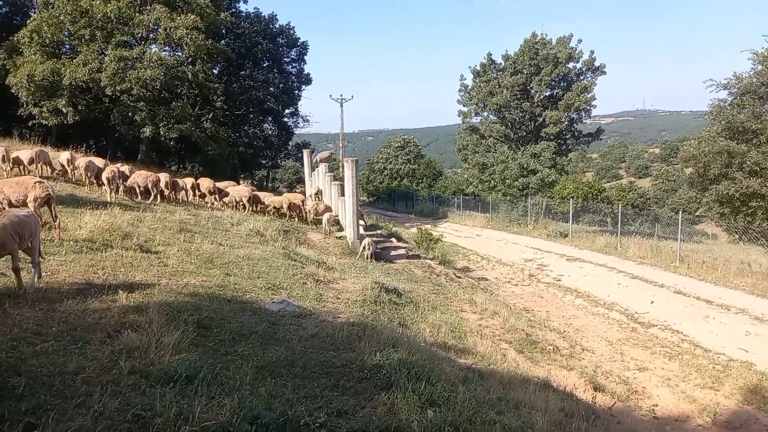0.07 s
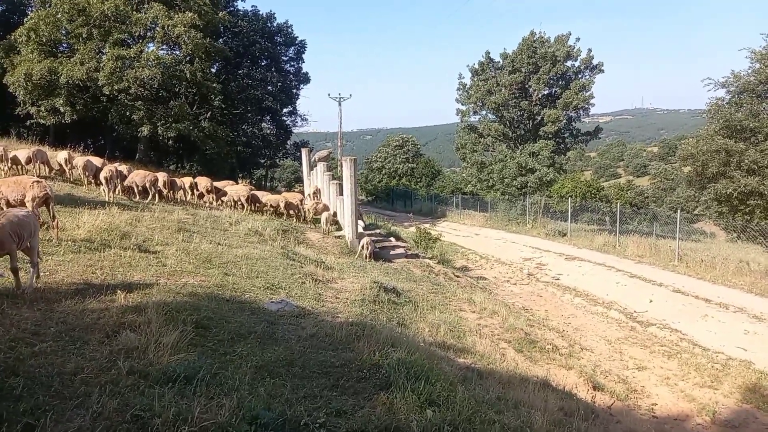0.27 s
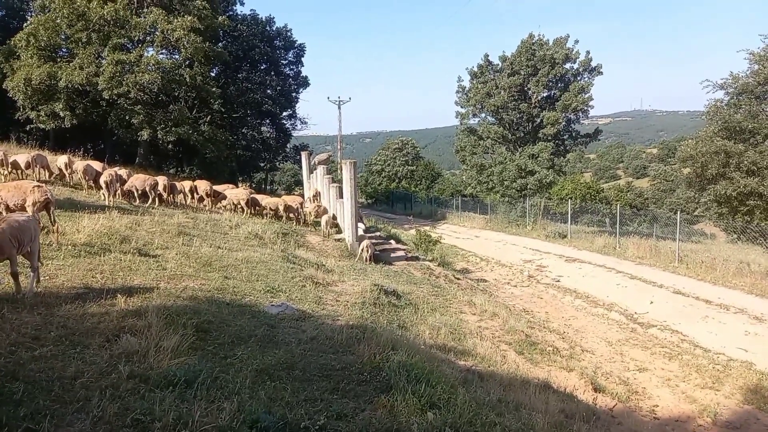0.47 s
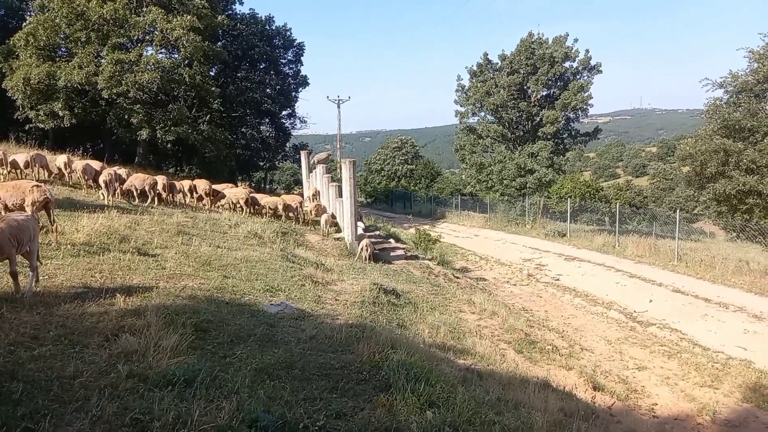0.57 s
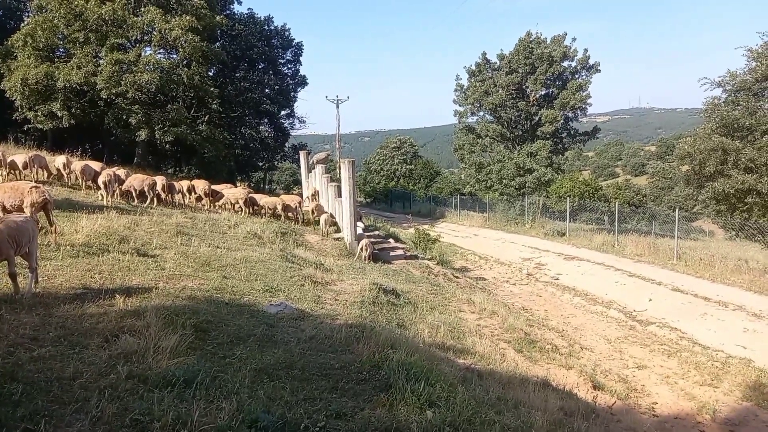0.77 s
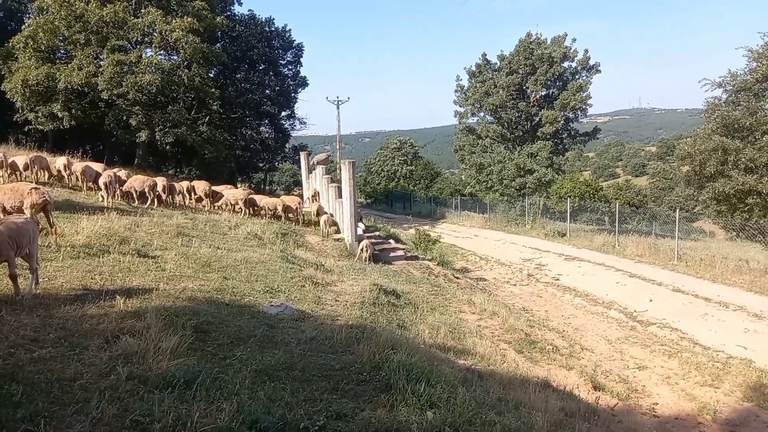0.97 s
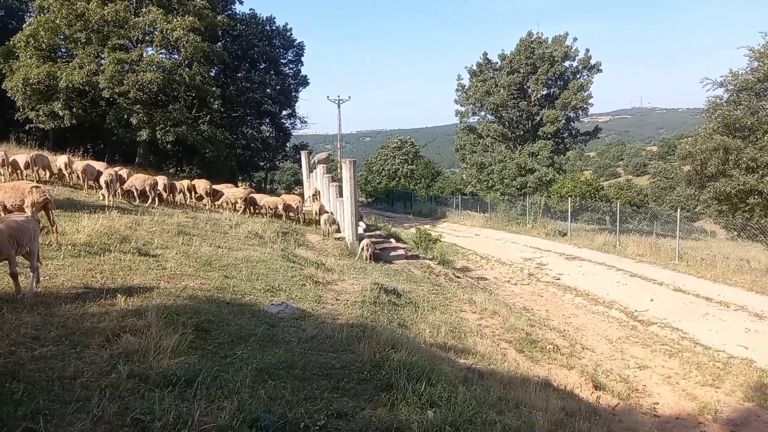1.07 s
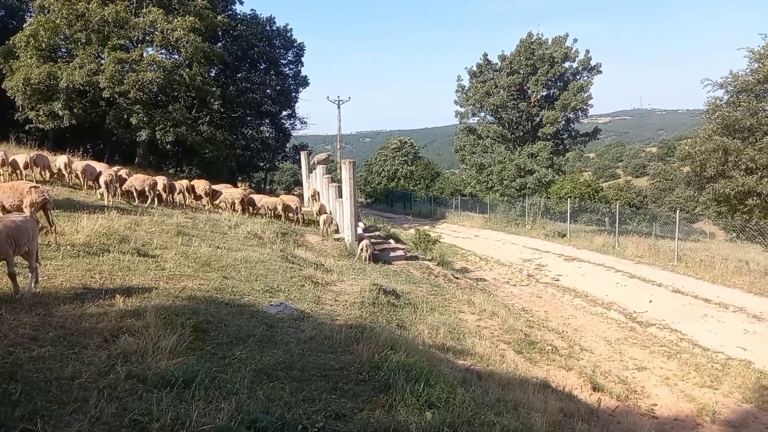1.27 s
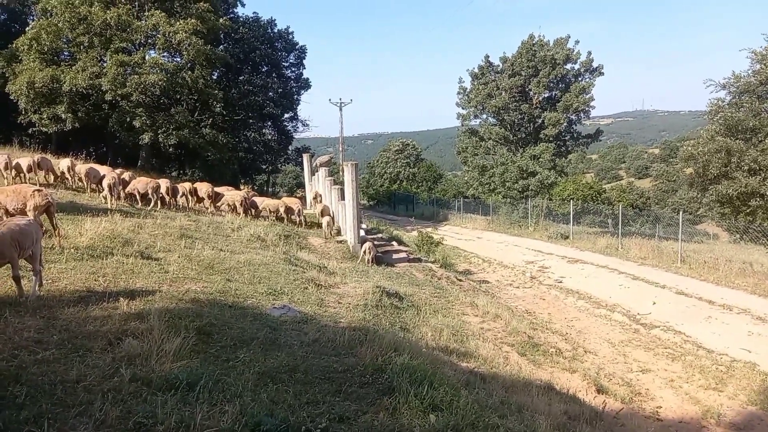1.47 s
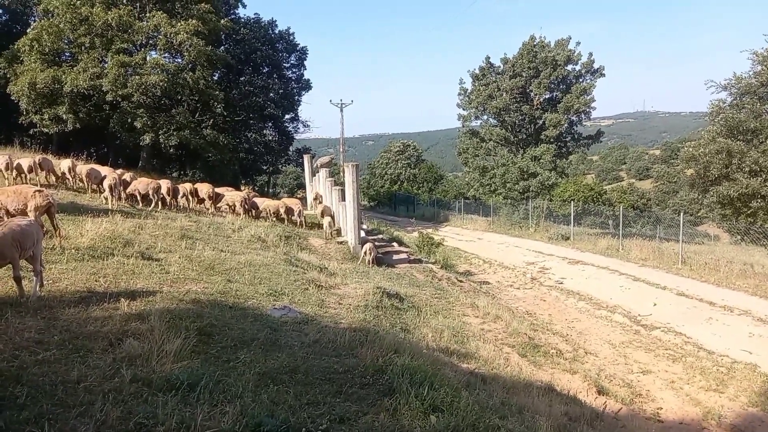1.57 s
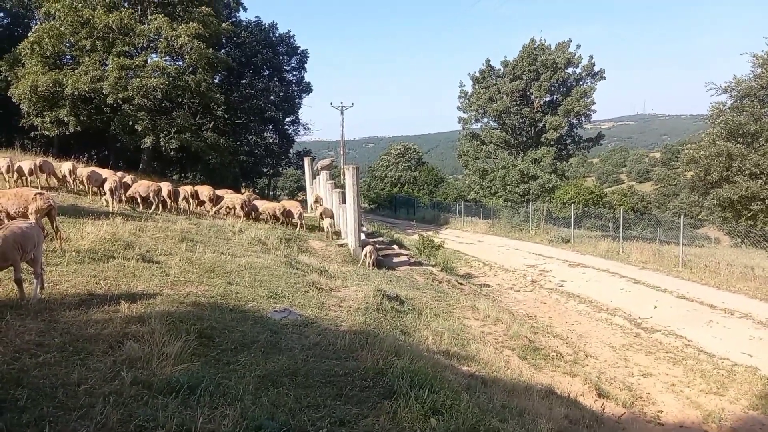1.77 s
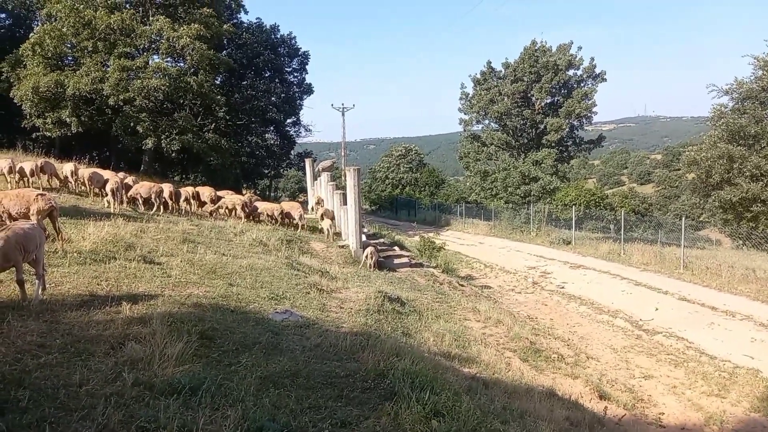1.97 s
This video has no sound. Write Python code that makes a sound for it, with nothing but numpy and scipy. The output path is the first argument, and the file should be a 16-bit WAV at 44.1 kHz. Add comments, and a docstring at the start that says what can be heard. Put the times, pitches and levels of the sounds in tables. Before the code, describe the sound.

A sheep gives one trembling bleat that rises and then sags in pitch on an open hillside. Tin flock bells clank and tinkle slightly to the left throughout, while wind rumbles on the microphone and then drops.

```python
"""A sheep bleats once on an open hillside: a clean, trembling voice that rises and sags,
made of vocal-fold harmonics filtered by the resonances of the throat.
To the left the flock's tin bells clank and tinkle, each clapper blow exciting damped modes.
Turbulent wind buffets the two microphone ports, then drops; leaves and grass hiss faintly."""
import sys
import numpy as np
from scipy import signal
from scipy.fft import rfft, irfft
from scipy.io import wavfile
from scipy.ndimage import uniform_filter1d

SR = 44100
rng = np.random.default_rng(int(sys.argv[2]) if len(sys.argv) > 2 else 0)


def output_pcm(signal):
    """Save a mono or channel-first signal as 16-bit PCM at the path in sys.argv[1].

    Samples are clipped to [-1, 1] before scaling.
    """
    pcm = np.clip(np.atleast_2d(signal).T, -1, 1) * 32767
    wavfile.write(sys.argv[1], SR, np.round(pcm).astype(np.int16))


N = 88817
T = np.arange(N) / SR


def undb(db):
    """Amplitude ratio of a level."""
    return 10 ** (np.asarray(db) / 20)


def unit(x):
    """Normalisation to rms 1."""
    return x / np.sqrt(np.mean(x ** 2))


def coloured_noise(spectrum):
    """Spectral shaping of white noise, rms 1."""
    hz, db = np.array(spectrum).T
    f = np.maximum(np.arange(N // 2 + 1) * SR / N, 1)
    gain = undb(np.interp(np.log(f), np.log(hz), db))
    return unit(irfft(rfft(rng.standard_normal(N)) * gain, N))


def band_noise(hz):
    """Band-pass filtering of white noise, rms 1."""
    bandpass = signal.butter(2, hz, "band", fs=SR, output="sos")
    return unit(signal.sosfilt(bandpass, rng.standard_normal(N)))


def wander(per_s):
    """Random modulation: smoothed steps, rms 1."""
    k = int(SR / per_s)
    steps = np.repeat(rng.standard_normal(N // k + 1), k)
    return unit(uniform_filter1d(uniform_filter1d(steps, k), k)[:N])


def place(x, lag_s, pan_db):
    """Localisation by time and level difference: the right channel is later and weaker."""
    delay = np.exp(-1j * np.pi * np.arange(N + 1) / N * lag_s * SR)
    late = irfft(rfft(x, 2 * N) * delay)[:N]
    return np.array([x * undb(pan_db / 2), late * undb(-pan_db / 2)])


def slope_echo(x, db, t60_s):
    """Diffuse reflection off the slope: a decaying tail, different left and right."""
    t = T[:SR // 3]
    tail = rng.standard_normal((2, len(t))) * undb(-60 * t / t60_s)
    tail *= undb(db) / np.sqrt((tail ** 2).sum(axis=1, keepdims=True))
    return signal.fftconvolve(x[None], tail, axes=1)[:, :N]


# Spectrum of the hillside hiss: f/Hz, relative level/dB
AIR_SPECTRUM = [(60, -2), (400, -0.5), (1000, 3), (1900, -8.5), (5600, 2), (7800, -5.5), (10800, -15.5),
                (15000, -10)]


def air(level_db=-62, pan_db=2, correlation=0.44):
    """Partial coherence: the hiss of distant leaves and grass is only partly common to both sides."""
    common = coloured_noise(AIR_SPECTRUM)
    separate = np.array([coloured_noise(AIR_SPECTRUM) for _ in range(2)])
    hiss = np.sqrt(correlation) * common + np.sqrt(1 - correlation) * separate
    return hiss * undb(level_db + 0.28 * wander(per_s=5.714) + np.array([[pan_db], [-pan_db]]) / 2)


# Gust envelope: t/s, relative level/dB
GUSTS = [(0.0, -52), (0.19, -39), (0.368, -47.5), (0.396, -38), (0.836, -54.5), (0.988, -42.5),
         (1.06, -66.5), (1.18, -41.5), (1.6, -81.5)]
# Spectrum of the rumble: f/Hz, relative level/dB
WIND_SPECTRUM = [(20, -22), (45, -13), (82, 1), (115, -9), (200, -17), (400, -29.5), (700, -61)]


def wind(buffet_db=3.5, pan_db=1):
    """Turbulent pressure fluctuation: each port rumbles in buffets of its own."""
    times, db = np.array(GUSTS).T
    ports = np.array([unit(coloured_noise(WIND_SPECTRUM) * undb(buffet_db * wander(per_s=30)))
                      for _ in range(2)])
    ports[1] -= 0.2 * ports[0]  # a small part in antiphase
    left_share = 1 / (1 + undb(-2 * pan_db))
    return 2 * ports * np.sqrt([[left_share], [1 - left_share]]) * undb(np.interp(T, times, db))


# Modes of each bell, the body clank first: f/Hz, relative level/dB, T60/s
BELL_MODES = { "big": [(912.8, 6.5, 0.22), (890.6, -6.5, 0.31), (2662, -23, 1), (4473, -19.5, 0.86),
              (4895, -25, 0.73)], "low": [(800.2, 5, 0.13), (4153, -17, 0.62), (9600, -20.5, 0.16)],
              "thin": [(957, 10.5, 0.2), (2813, 0, 0.61), (4800, -10, 0.28), (8970, -5.5, 0.065),
              (9580, 0.5, 0.037)], "round": [(986, 8, 0.13), (5297, -2, 0.25)], "tiny": [(4830, 0.5, 0.21)],
              "keen": [(4970, -1.5, .5), (9590, -1.5, 0.16)], "flat": [(1000, 11, 0.15), (2428, -7, 0.9),
              (4970, -1, 0.66)], }
# Short high modes of each bell: relative level/dB, list of f/Hz
SHINE_MODES = {"big": (-33, [7110, 10300, 11100, 14266]), "low": (-23, [5790, 12000]),
               "keen": (-10.5, [11500, 13400, 10000]), "thin": (-7, [5151, 12000, 15000]),
               "round": (-17.5, [7220, 11000, 12600, 13980]),
               "tiny": (-10.5, [6110, 9000, 10250, 12440, 13700]), "flat": (-11.5, [6900, 6600])}


def strike(out, bell, start_s, db, bright_db, stop_s, tune=1):
    """Impact excitation: adds to out a clack, a short rattle and modes that ring until stop_s."""
    rattle_db, rattle_s, clack_db, clack_s = -4, 0.0093, -24.5, 0.0021
    mode_scatter_db, shine_scatter_db, shine_t60_s, rise_cycles = 2.5, 4, 0.15, 2.8
    i = int(start_s * SR)
    t = T[:max(min(int((stop_s - start_s) * SR), N - i), 1)]
    chance = rng.standard_normal(12)
    shine_db, shine_hz = SHINE_MODES[bell]
    noise = np.resize(np.diff(rng.standard_normal(SR // 4)), len(t))
    rattle = undb(rattle_db + shine_db + bright_db) * np.exp(-t / rattle_s)
    clack = undb(clack_db) * np.exp(-t / clack_s)
    sound = noise * (rattle + clack)
    modes = [(*mode, mode_scatter_db) for mode in BELL_MODES[bell]]
    modes += [(hz, shine_db, shine_t60_s, shine_scatter_db) for hz in shine_hz]
    body_hz = modes[0][0]
    for k, (hz, mode_db, t60, scatter_db) in enumerate(modes):
        extra_db = bright_db + scatter_db * chance[k] if hz > body_hz else 0
        rise = 1 - np.exp(-t * hz / rise_cycles)
        sound += undb(mode_db + extra_db - 60 * t / t60) * rise * np.sin(2 * np.pi * hz * tune * t)
    release = np.clip((stop_s - start_s - t) * 500, 0, 1)
    out[i:i + len(t)] += undb(db) * sound * release


# Clapper blows: t/s, relative level/dB, upper-mode gain/dB, bell
CLAPPER_BLOWS = [(.002, -52, 2, "round"), (.075, -39.5, 1.5, "big"), (.109, -48, -1.5, "tiny"),
                 (.175, -52, 6, "thin"), (.226, -52, 3, "tiny"), (0.4, -56, 13, "thin"),
                 (.44, -37, -2.5, "big"), (0.593, -43.5, 3, "round"), (.653, -37, -11, "big"),
                 (.689, -56, 4, "thin"), (.736, -27.5, 2.5, "big"), (0.776, -50.5, 5, "tiny"),
                 (.805, -52.5, -2, "round"), (.805, -56, 0.5, "keen"), (.957, -41.5, -8, "low"),
                 (0.983, -59, 2, "tiny"), (1.025, -59.5, -2.5, "keen"), (1.103, -31.5, 3.5, "big"),
                 (1.197, -57.5, 18.5, "low"), (1.197, -61, 0, "thin"), (1.245, -53, 0, "flat"),
                 (1.292, -59, 1, "tiny"), (1.385, -50, 1.5, "thin"), (1.416, -55.5, -1, "tiny"),
                 (1.434, -59, 1, "keen"), (1.437, -37, -8.5, "low"), (1.452, -47.5, -15, "thin"),
                 (1.49, -26.5, -6.5, "big"), (1.49, -47, 0, "flat"), (1.608, -40.5, 4, "big"),
                 (1.634, -54.5, 6.5, "round"), (1.696, -42.5, 15.5, "big"), (1.719, -46, -10, "flat"),
                 (1.762, -53, -6, "thin"), (1.782, -56, 2, "tiny"), (1.813, -49.5, 2.5, "low"),
                 (1.868, -43.5, 6, "big"), (1.876, -50, 1, "keen"), (1.9, -37.5, 1.5, "big"),
                 (1.932, -35, -5.5, "low"), (1.96, -51, 0.5, "flat"), (1.989, -34, 2.5, "big")]


def near_bells():
    """Free decay: each bell rings until its clapper lands again, for a second at most."""
    out = np.zeros(N)
    for start_s, db, bright_db, bell in CLAPPER_BLOWS:
        later = [s for s, _, _, name in CLAPPER_BLOWS if name == bell and s > start_s]
        strike(out, bell, start_s, db, bright_db, stop_s=min(later + [start_s + 1]) + 0.002)
    return out


def far_bells(per_s=80, base_db=-68, swell_db_per_s=4.5, spread_db=2.5, detune=0.12):
    """A Poisson process: faint blows on randomly tuned bells merge into a swelling jingle."""
    out = np.zeros(N)
    s = -0.5
    for gap, choice, force, size in rng.random(size=(300, 4)):
        s -= np.log(gap) / per_s
        if 0 < s < N / SR:
            bell = list(BELL_MODES)[int(choice * len(BELL_MODES))]
            db = base_db + swell_db_per_s * s - spread_db * np.log(force)
            strike(out, bell, s, db, bright_db=0, stop_s=s + 0.25, tune=1 + detune * (2 * size - 1))
    return out


def flock_bells(crossover_hz=5700):
    """Frequency-dependent level difference: the treble lies further left, and it alone echoes."""
    bells = near_bells() + far_bells()
    treble = signal.sosfiltfilt(signal.butter(4, crossover_hz, "high", fs=SR, output="sos"), bells)
    direct = place(bells - treble, lag_s=0.0004827, pan_db=2.4) + place(treble, lag_s=0, pan_db=5)
    return direct + slope_echo(treble, db=-4.5, t60_s=0.29)


# Puffs of wind: t/s, peak level/dB
PORT_PUFFS = [(.024, -49), (0.057, -43), (0.08, -37.5)]


def puffs(width_s=0.0078):
    """Brief turbulence on the right port: three Gaussian bursts of noise."""
    envelope = sum(undb(db) * np.exp(-((T - s) / width_s) ** 2) for s, db in PORT_PUFFS)
    return np.array([np.zeros(N), band_noise(hz=(283, 694)) * envelope])


# Pitch and loudness of the call: t/s, f/Hz, level/dB
BLEAT_CONTOUR = [(0.044, 312.2, -59), (0.052, 324.3, -45), (0.068, 356.1, -44), (0.11, 285.6, -50.5),
                 (0.144, 349.5, -33.5), (0.168, 318.5, -41.5), (0.204, 354.8, -33.5), (0.222, 328.3, -38.5),
                 (0.272, 353.6, -34.5), (0.294, 365.7, -38.5), (0.342, 368.1, -41), (0.406, 383.8, -35),
                 (0.556, 363.2, -40.5), (0.568, 374, -38.5), (0.644, 358.7, -39), (0.728, 339.9, -38.5),
                 (0.748, 316.5, -44), (0.794, 339.4, -36.5), (0.814, 327.5, -42), (0.872, 324.3, -42.5),
                 (0.89, 317.3, -42), (0.91, 291.3, -46), (0.954, 286, -41), (0.97, 274, -49.5),
                 (1.005, 275, -62)]
# Throat resonances: f/Hz, width/Hz, relative level/dB, open-mouth gain/dB
FORMANTS = [(747, 230, -25.5, 5), (1024, 593, -15, 3), (2053, 217, 6.5, 3), (2614, 490, -8, 11),
            (3116, 196, -3, 3), (3688, 310, -16.5, 4.5)]


def bleat(jitter=0.00386, shimmer_db=1.8, breath_db=-25):
    """Source and filter: formants weight the vocal-fold harmonics; breath pulses with each cycle."""
    times, *contours = np.array(BLEAT_CONTOUR).T
    pitch, level_db = (uniform_filter1d(np.interp(T, times, c), SR // 250) for c in contours)
    # The mouth opens as the pitch rises, less so late in the call.
    shut_hz, tiring_hz_per_s, span_hz = 294.4, 51, 55
    opening = np.clip((pitch - shut_hz - tiring_hz_per_s * T) / span_hz, 0, 1)
    pitch *= 1 + jitter * wander(per_s=70.37)
    phase = 2 * np.pi * np.cumsum(pitch) / SR

    def throat_gain(f):
        return sum(undb(db + open_db * opening) / (1 + (2 * (f - hz) / width) ** 2) ** 1.225
                   for hz, width, db, open_db in FORMANTS)

    amplitudes = [throat_gain(k * pitch) * undb(shimmer_db * wander(per_s=60.5)) for k in range(1, 17)]
    rms = np.sqrt(sum(a ** 2 for a in amplitudes) / 2)
    voice = sum(a * np.sin(k * phase - k * k / 8) for k, a in enumerate(amplitudes, 1)) / rms
    breath = band_noise(hz=(1970, 3460)) * (1 + np.cos(phase))
    gate = np.clip(np.minimum(T - times[0], times[-1] - T) * 100, 0, 1)
    call = (voice + undb(breath_db) * breath) * undb(level_db) * gate
    return place(call, lag_s=0.00005, pan_db=0.7) + slope_echo(call, db=-16, t60_s=0.34)


def scene():
    """Superposition: the pressures of all sources add."""
    return bleat() + flock_bells() + wind() + puffs() + air()


def record(dry):
    """Band limiting: a steep low-pass cuts the treble above 16.1 kHz."""
    return signal.sosfilt(signal.ellip(10, 0.2, 70, 16100, fs=SR, output="sos"), dry)


dry = scene()
out = record(dry)
output_pcm(out)
```